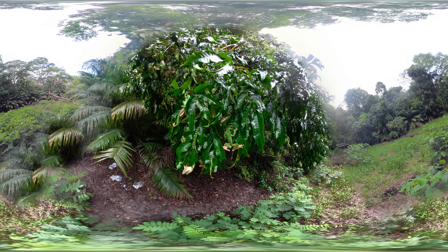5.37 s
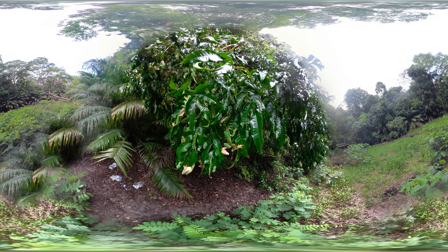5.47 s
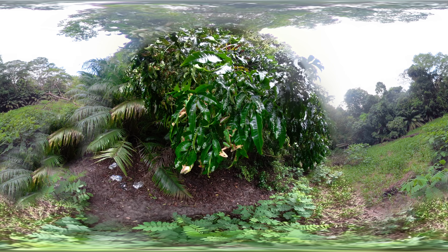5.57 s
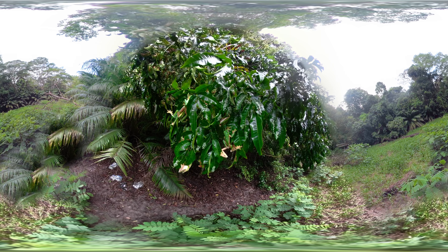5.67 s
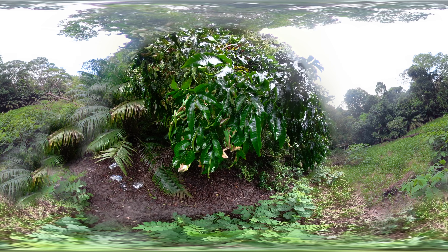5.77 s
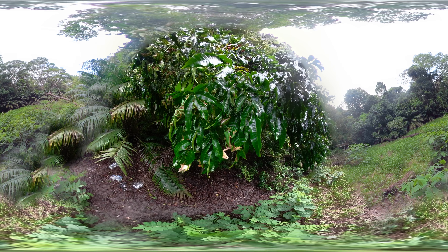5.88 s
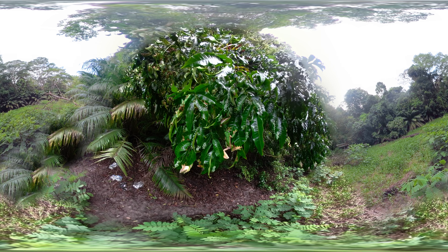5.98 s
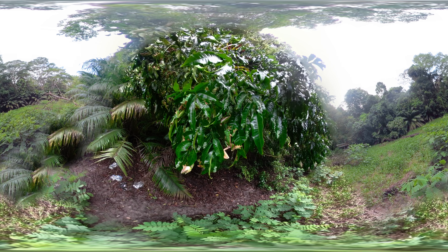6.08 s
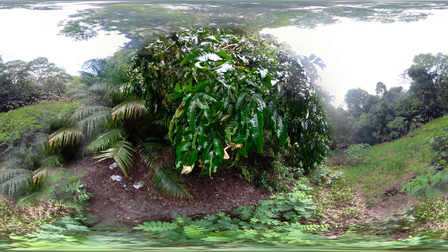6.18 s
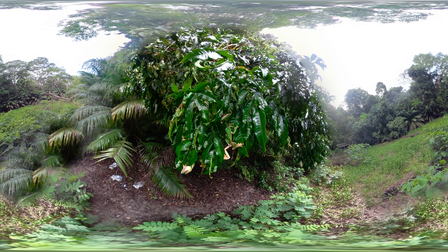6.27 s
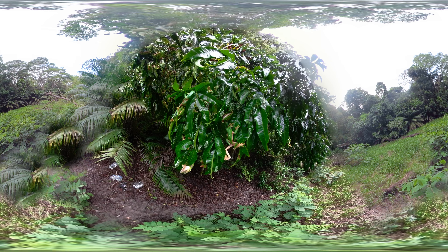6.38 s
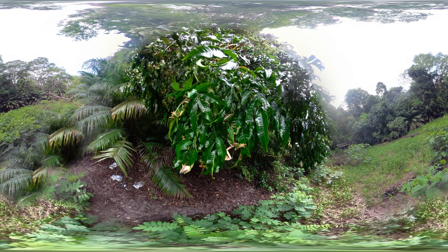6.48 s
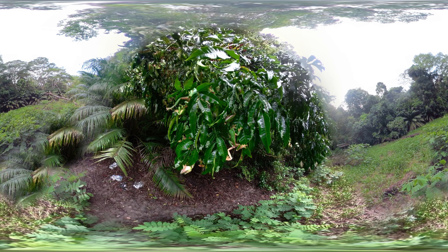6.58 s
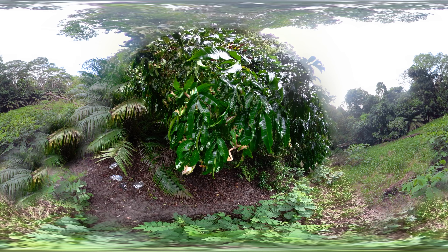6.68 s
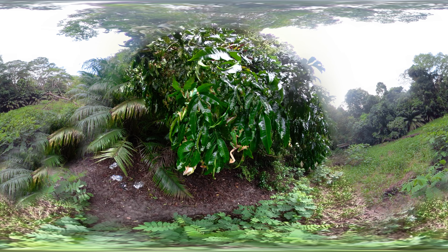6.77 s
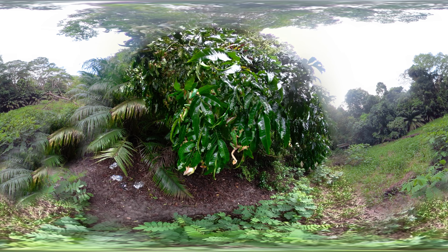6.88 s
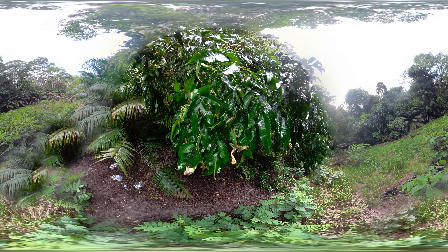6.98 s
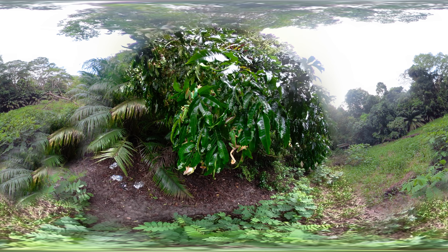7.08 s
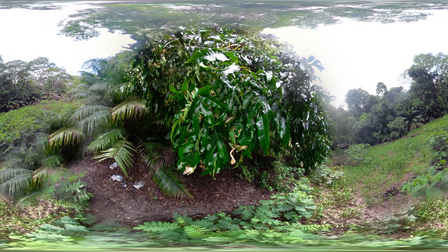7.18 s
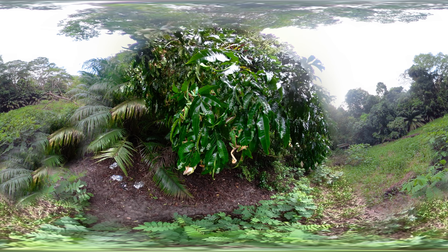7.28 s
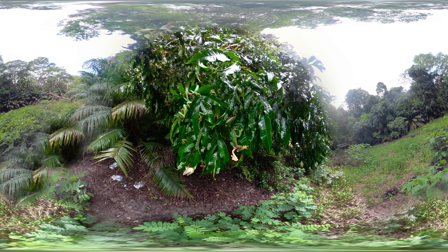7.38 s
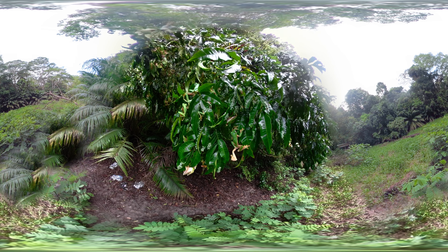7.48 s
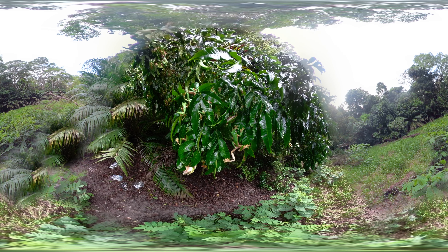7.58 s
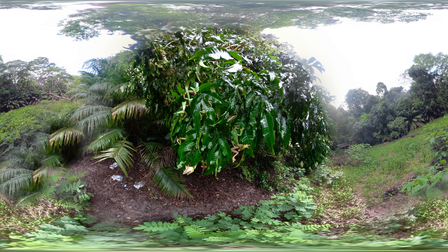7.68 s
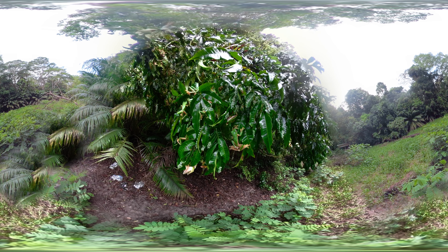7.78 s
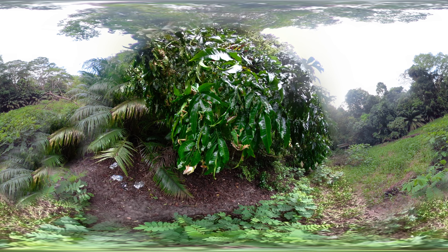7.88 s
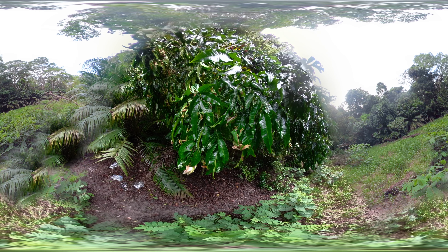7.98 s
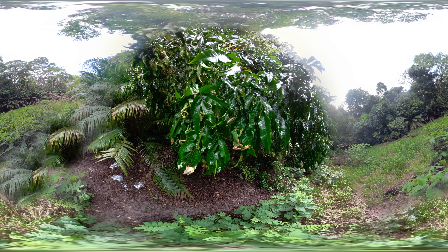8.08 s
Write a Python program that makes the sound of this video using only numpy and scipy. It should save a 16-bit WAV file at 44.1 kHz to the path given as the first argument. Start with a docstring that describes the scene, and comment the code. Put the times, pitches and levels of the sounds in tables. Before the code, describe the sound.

In a damp forest clearing, frogs croak continuously in an overlapping, pulsing chorus. Above them cicadas whine steadily, a katydid buzzes faintly and a cricket trills about once a second. Birds give a few brief, quiet whistles, while occasional drops tick on leaves and foliage rustles. Low gusts of wind buffet the microphone, strongest just past the middle, and then the katydid fades as the frogs carry on.

```python
"""A damp forest clearing. From the start a pond chorus of frogs croaks in overlapping pulse trains near
1 kHz over wind on the microphone, whining cicadas and a buzzing katydid; birds whistle briefly and a
cricket trills about once a second. From 1.4 s the higher cicada band fades. Between 1.7 and 6.8 s drops
tick and leaves rustle; far bird notes return at 2.5 s, a close whistle at 3.5 s. The strongest gust
peaks at 5.5 s, then the katydid fades while the frogs croak on."""
import sys
import numpy as np
from scipy import signal
from scipy.fft import rfft, irfft, next_fast_len
from scipy.io import wavfile

SR = 44100
rng = np.random.default_rng(int(sys.argv[2]) if len(sys.argv) > 2 else 0)


def file_out(sig):
    """Save sig as 16-bit WAV at sys.argv[1]."""
    # one column per channel
    cols = np.atleast_2d(sig).T
    # limit, then scale
    lim = np.clip(cols, -1, 1)
    pcm = np.round(lim * 32767).astype(np.int16)
    wavfile.write(sys.argv[1], SR, pcm)


N = 358091
CROAK_HZ = 158.1  # vocal pulse rate


def undb(db):
    return 10 ** (np.asarray(db) / 20)


def clock():
    return np.arange(N) / SR


def noise():
    return rng.standard_normal(N)


def tone(hz):
    return np.sqrt(2) * np.sin(2 * np.pi * np.cumsum(hz) / SR)


def add(out, start_s, x):
    i = int(start_s * SR)
    out[i:i + len(x)] += x[:len(out) - i]


def walk(rate_hz, size=N):
    """Random values 1 / rate_hz apart, joined by ramps."""
    places = np.arange(size) * rate_hz / SR
    return np.interp(places, np.arange(4096), rng.standard_normal(4096))


def gate(length_s, edge_s):
    """Window with linear edges."""
    t = np.arange(int(length_s * SR)) / SR
    return np.clip(np.minimum(t, length_s - t) / edge_s, 0, 1)


def colour(x, spectrum):
    """Shape by (f/Hz, gain/dB) points, silent outside them; rms 1."""
    hz, db = np.transpose(spectrum)
    n = next_fast_len(len(x))
    bins_hz = np.arange(n // 2 + 1) * SR / n + 1e-9
    gain_db = np.interp(np.log(bins_hz), np.log(hz), db, left=-150, right=-150)
    y = irfft(rfft(x, n) * undb(gain_db), n)[:len(x)]
    return y / np.sqrt(np.mean(y ** 2))


def forest(x, t60_s, wet_db):
    """Trunks and leaves scatter a decaying tail behind the direct sound."""
    t = np.arange(int(SR * t60_s)) / SR
    tail = rng.standard_normal(SR)[:len(t)] * undb(-60 * t / t60_s)
    path = undb(wet_db) * tail / np.sqrt(np.sum(tail ** 2))
    path[0] += 1
    return signal.oaconvolve(x, path)[:N]


def distance(haze_db=-47.5, rumble_db=-37.5):
    """Haze of distant insects over a steady far rumble."""
    # spectra: f/Hz, gain/dB
    haze_band = [(2500, -20), (4000, -28.5), (4900, -11.5), (5600, 0.5), (6500, -7.5), (9000, -19),
                 (10500, -27.5), (12500, -36), (14500, -42), (15700, -55.5)]
    rumble_band = [(70, -4.5), (110, -5), (170, 0.5), (310, -7.5), (420, -14), (600, -15.5)]
    haze = undb(haze_db + 0.8 * walk(4)) * colour(noise(), haze_band)
    rumble = undb(rumble_db + 1.7 * walk(3)) * colour(noise(), rumble_band)
    return haze + rumble


def wind(breeze_db=-35.5, rise_s=0.08, fall_s=0.13):
    """Gusts over a breeze buffet the microphone."""
    # gust peaks: t/s, level/dB
    gusts = [(.6, -33), (1.0, -32), (1.5, -34), (4.55, -31), (5.47, -25.5), (6.05, -34.5), (6.72, -33.5),
             (7.6, -37)]
    # buffet spectrum: f/Hz, gain/dB
    buffet_band = [(15, 3.5), (40, 5), (70, -4), (120, -18.5)]
    strength = np.full(N, undb(breeze_db))
    for peak_s, db in gusts:
        late_s = clock() - peak_s
        width_s = np.where(late_s < 0, rise_s, fall_s)
        strength += undb(db) * np.exp(-(late_s / width_s) ** 2)
    return strength * undb(0.75 * walk(6.6)) * colour(noise(), buffet_band)


def foliage(tick_decay_s=0.0071):
    """Drops tick on leaves; shaken leaves crackle in bursts."""
    # drops: t/s, level/dB, treble offset/dB
    ticks = [(1.7544, -40, -19.5), (3.29, -32.5, -24), (3.4817, -29, -20), (5.7813, -44, -45),
             (5.9623, -51, -16), (6.0794, -47, -28)]
    # shaken leaves: t/s, length/s, level/dB
    rustles = [(2.352, 0.069, -41.5), (4.446, 0.033, -43), (6.728, 0.038, -49.5)]
    # rustle spectrum: f/Hz, gain/dB
    leaf_band = [(2500, -4), (4500, -2.5), (5700, 2), (7000, -10), (10000, -17.5), (14000, -20),
                 (14800, -41)]
    body, treble, shake = np.zeros((3, N))
    onset = gate(0.05, 0.0015)
    tick = onset * np.exp(-np.arange(len(onset)) / SR / tick_decay_s)
    for start_s, db, treble_db in ticks:
        add(body, start_s, undb(db - 4.5) * tick)
        add(treble, start_s, undb(db + treble_db) * tick)
    for start_s, length_s, db in rustles:
        add(shake, start_s, undb(db) * gate(length_s, 0.007))
    body *= colour(noise(), [(2000, -5), (3000, 0.5), (6000, -4), (8000, -16)])
    treble *= colour(noise(), [(8000, -7), (10000, -3), (12800, -5), (13500, -26)])
    crackle = colour(noise() * undb(2.8 * walk(220)), leaf_band)
    return forest(body + treble + shake * crackle, t60_s=0.64, wet_db=-0.5)


def birds(swell_db=10, fade_db=8):
    """Near-pure tones: a close whistler, and a rougher far singer heard mostly through the trees."""
    # swelling whistles: t/s, length/s, start f/Hz, peak f/Hz, end level/dB
    whistles = [(0, .135, 3840, 4000, -48), (3.536, 0.199, 3840, 4040, -38.5)]
    # fading far notes: t/s, length/s, start f/Hz, end f/Hz, start level/dB
    notes = [(.115, .03, 4250, 4050, -52), (.145, .03, 4100, 3200, -52), (.195, .06, 4500, 4600, -52),
             (.275, .04, 4480, 4500, -55), (2.53, .055, 4400, 3300, -50), (2.6, .04, 3850, 3950, -52),
             (2.61, .04, 4500, 4420, -51), (2.77, .03, 4950, 4950, -51), (2.815, .06, 4400, 4300, -49),
             (2.88, .05, 3300, 3950, -50), (2.96, .04, 4750, 4750, -54), (2.99, .04, 3200, 3500, -50),
             (3.07, .05, 2650, 3100, -50), (4.408, .012, 5600, 4350, -48), (4.425, .025, 4300, 4900, -48),
             (5.22, .04, 4500, 3250, -52), (5.255, .02, 3250, 3500, -48), (5.28, .1, 4500, 4420, -48)]
    close, far = np.zeros((2, N))
    for start_s, length_s, from_hz, peak_hz, db in whistles:
        window = gate(length_s, 0.01)
        progress = np.linspace(0, 1, len(window))
        hz = from_hz + (peak_hz - from_hz) * np.sin(2.5 * progress ** 1.7)
        add(close, start_s, window * undb(db - swell_db * (1 - progress)) * tone(hz))
    for start_s, length_s, from_hz, to_hz, db in notes:
        window = gate(length_s, 0.0013)
        n = len(window)
        hz = np.linspace(from_hz, to_hz, n) * (1 + 0.016 * walk(150, n))
        add(far, start_s, window * undb(db - np.linspace(0, fade_db, n)) * tone(hz))
    return forest(close, t60_s=0.6, wet_db=-11) + forest(far, t60_s=1, wet_db=5)


def cicadas(near_db=-42, high_db=-46.5, throb_hz=57.6, fade_from_s=1.4, fade_db_per_s=1.14):
    """Many singers blur into two whining bands; one throbs through faintly."""
    # whine spectra: f/Hz, gain/dB
    near_band = [(6500, -3.5), (6900, 1), (7300, 8), (7550, -5), (7900, -11)]
    high_band = [(7400, 3.5), (8300, 1), (8900, -12.5), (9500, -11.5), (10300, -23.5)]
    throb = 1 + 0.065 * np.sin(2 * np.pi * throb_hz * clock())
    fade_db = fade_db_per_s * np.maximum(clock() - fade_from_s, 0)
    near = undb(near_db + 0.21 * walk(10)) * throb * colour(noise(), near_band)
    high = undb(high_db - fade_db + 0.37 * walk(9.4)) * colour(noise(), high_band)
    return near + high


def katydid(stroke_hz=104.3, chirp_hz=14):
    """Alternate strong and weak strokes, grouped into chirps, scrape a broad wing resonance."""
    # buzz envelope: t/s, level/dB
    levels = [(0, -53), (5.5, -55), (8.12, -62)]
    # wing resonance: f/Hz, gain/dB
    wing_band = [(5600, -20), (5850, 0), (6250, -1), (6500, -20)]
    phase = clock() * stroke_hz % 1
    strong = np.exp(-phase / 0.11)
    weak = 0.5 * np.exp(-((phase - 0.5) % 1) / 0.12)
    chirp_cycles = np.cumsum(chirp_hz * (1 + 0.016 * walk(1))) / SR
    chirps = np.clip(np.sin(2 * np.pi * chirp_cycles) + 0.25, 0, 1)
    scrape = forest((strong + weak) * chirps * noise(), t60_s=0.14, wet_db=-1.5)
    level_db = np.interp(clock(), *np.transpose(levels))
    return undb(level_db) * colour(scrape, wing_band)


def cricket(wing_hz=5360, stroke_hz=64.5, stroke_db=-43.7, duty=0.6):
    """Each wing stroke is a short tone that slides down a little."""
    # trills: t/s, length/s
    trills = [(.28, .39), (1.25, .45), (2.23, .49), (3.32, .44), (4.41, .45), (5.42, .48), (6.46, .5),
              (7.52, .48)]
    song = np.zeros(N)
    for start_s, length_s in trills:
        window = gate(length_s, 0.025)
        n = len(window)
        phase = np.cumsum(stroke_hz * (1 + 0.03 * walk(20, n)) / SR) % 1
        hz = wing_hz * (1 + 0.005 * walk(40, n) - 0.025 * (phase - 0.3))
        strokes = np.sin(np.pi * np.clip(phase / duty, 0, 1))
        add(song, start_s, window * strokes * tone(hz))
    return forest(song * undb(stroke_db + 1.5 * walk(30)), t60_s=0.3, wet_db=-8)


def vocal_pulses(hz, scatter_db):
    """One frog: a click of uneven size per vocal cycle; rms near 1."""
    cycle = np.floor(np.cumsum(hz / SR)).astype(int)
    size = undb(scatter_db * rng.standard_normal(4096))[cycle]
    return np.diff(cycle, prepend=0) * size * np.sqrt(SR / hz)


def close_frog():
    """Short raspy croaks: pulses ring two vocal sac resonances."""
    # croaks: t/s, length/s, upper level/dB, lower level/dB
    rasps = [(0.365, 0.051, -54, -58), (0.597, .035, -57, -49), (.79, .031, -58, -47),
             (0.997, 0.026, -54, -40), (1.21, .03, -60, -47), (4.746, .038, -50.5, -68),
             (5.09, .031, -54, -55), (7.88, 0.21, -57, -59)]
    # sac resonances: f/Hz, gain/dB
    upper_band = [(2600, -25), (3000, 6), (3900, 7), (4300, -28)]
    lower_band = [(1900, -20), (2250, 3), (2550, -2), (2900, -22)]
    upper, lower = np.zeros((2, N))
    for start_s, length_s, upper_db, lower_db in rasps:
        add(upper, start_s, undb(upper_db) * gate(length_s, 0.0022))
        add(lower, start_s, undb(lower_db) * gate(length_s, 0.0049))
    pulses = vocal_pulses(CROAK_HZ * (1 + 0.013 * walk(60)), scatter_db=3.5)
    return upper * colour(pulses, upper_band) + lower * colour(pulses, lower_band)


def frog_chorus(croak_s=0.13, far_callers=5, far_db=-26, rasp_gain_db=-27.5):
    """Each croak has its own pitch and path through the trees; far callers run together."""
    # prominent croaks: centre t/s, level/dB
    croaks = [(.169, -23), (.383, -25.5), (.607, -24), (.801, -23.5), (0.998, -24.5), (1.177, -23.5),
              (1.487, -24), (1.696, -23.5), (2.04, -20), (2.27, -22.5), (2.5, -24.5), (2.64, -23.5),
              (2.866, -21.5), (3.034, -28), (3.384, -22.5), (3.514, -21), (3.651, -23), (3.792, -21.5),
              (3.9, -22), (4.03, -21), (4.126, -22.5), (4.315, -22), (4.53, -24), (4.67, -25.5),
              (4.758, -23.5), (4.91, -22.5), (5.122, -23), (5.262, -22.5), (5.594, -25.5), (5.715, -24.5),
              (5.856, -27), (6.05, -26), (6.305, -25.5), (6.514, -24), (6.715, -24), (6.899, -29.5),
              (7.176, -32.5), (7.375, -24), (7.578, -23.5), (7.809, -27.5), (7.901, -25.5), (8.048, -23.5)]
    # throat resonance and rasp above it: f/Hz, gain/dB
    throat_band = [(450, -34), (540, -23.5), (640, -14), (780, -6), (960, -0.5), (1140, -2.5), (1360, -13),
                   (1800, -29.5), (2200, -56)]
    rasp_band = [(1600, -18.5), (1900, 2.5), (2600, 2.5), (3200, -5), (4500, -11.5)]
    near, far = np.zeros((2, N))
    swell = np.sin(np.linspace(0, np.pi, int(croak_s * SR))) ** 2
    for centre_s, db in croaks:
        hz = CROAK_HZ * (1 + 0.035 * rng.standard_normal() + 0.04 * walk(70, len(swell)))
        croak = swell * vocal_pulses(hz, scatter_db=1.8)
        croak *= undb(db) * np.sqrt(np.sum(swell ** 2) / np.sum(croak ** 2))
        add(near, centre_s - croak_s / 2, forest(croak, t60_s=0.16, wet_db=-5))
    for _ in range(far_callers):
        hz = CROAK_HZ * (1 + 0.05 * walk(7) + 0.06 * walk(100))
        caller = undb(far_db + 3.4 * walk(24)) * vocal_pulses(hz, scatter_db=3.8)
        far += forest(caller, t60_s=0.27, wet_db=5.54) / far_callers
    rms = np.sqrt(np.mean((near + far) ** 2))
    body = colour(near + far, throat_band)
    rasp = undb(rasp_gain_db) * colour(near + 1.06 * far, rasp_band)
    return rms * (body + rasp)


def scene():
    frogs = frog_chorus() + close_frog()
    insects = cricket() + katydid() + cicadas()
    return (frogs + insects + birds() + foliage() + wind() + distance())[None]


def record(dry):
    """Steep low-pass at 15750 Hz."""
    return signal.sosfilt(signal.ellip(8, 0.2, 70, 15750, fs=SR, output="sos"), dry)


dry = scene()
out = record(dry)
file_out(out)
```